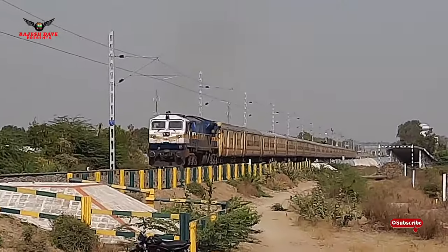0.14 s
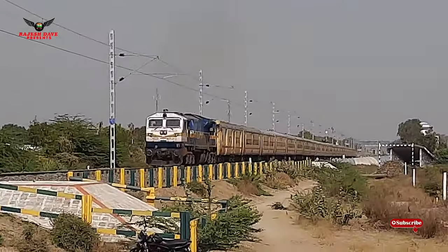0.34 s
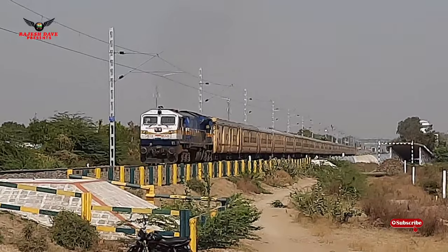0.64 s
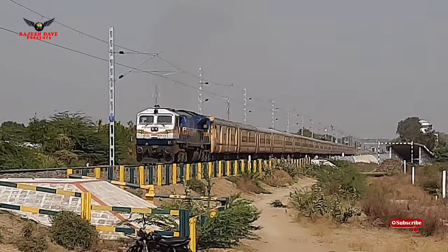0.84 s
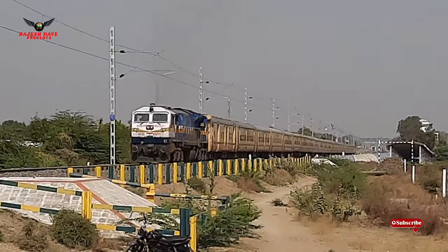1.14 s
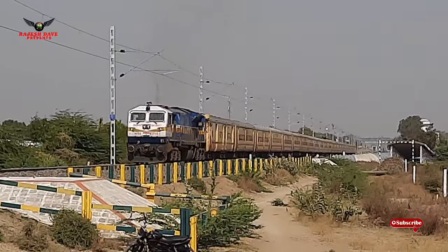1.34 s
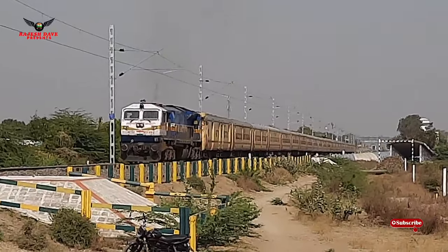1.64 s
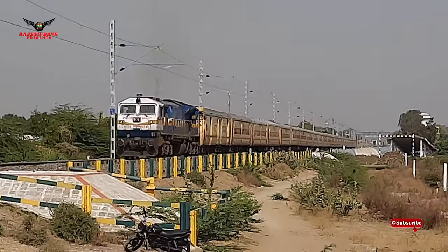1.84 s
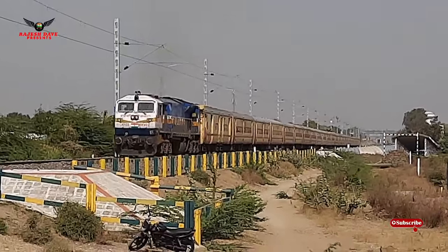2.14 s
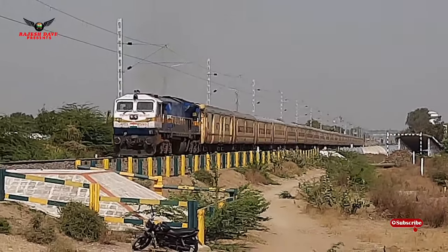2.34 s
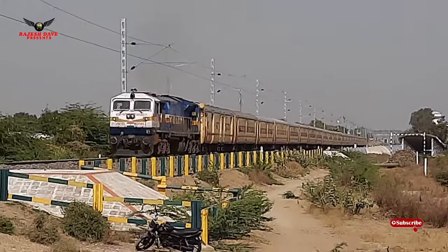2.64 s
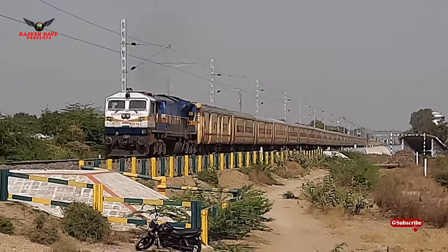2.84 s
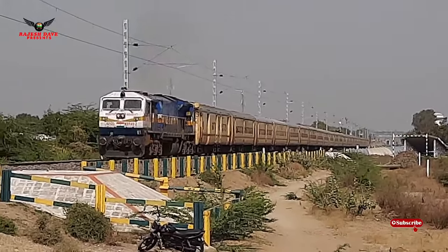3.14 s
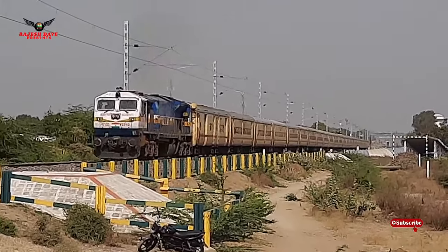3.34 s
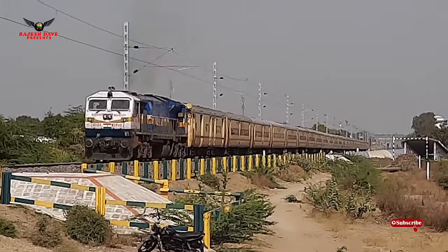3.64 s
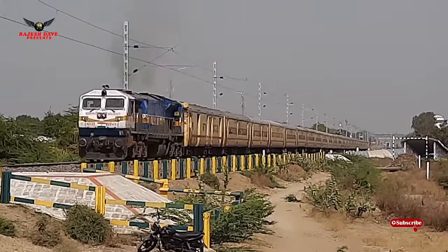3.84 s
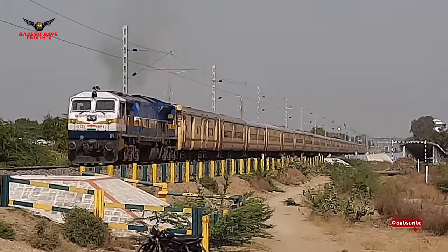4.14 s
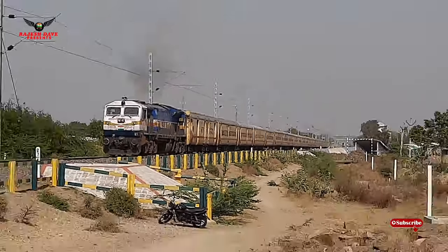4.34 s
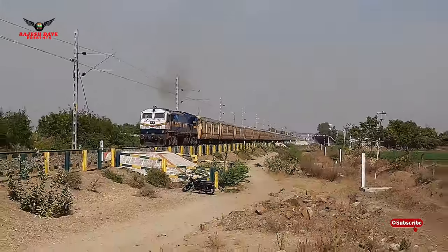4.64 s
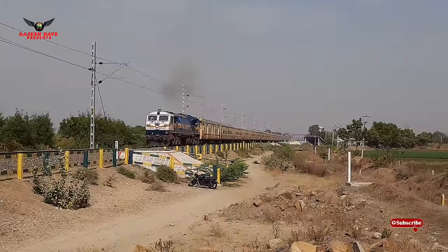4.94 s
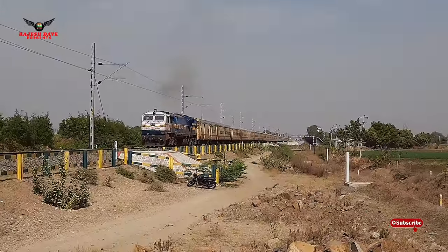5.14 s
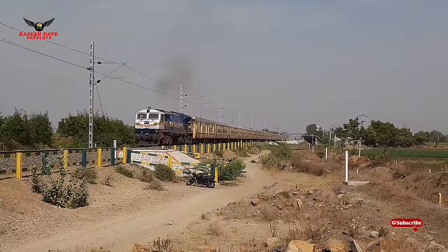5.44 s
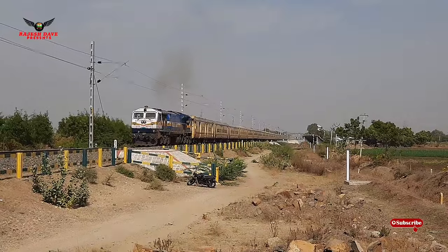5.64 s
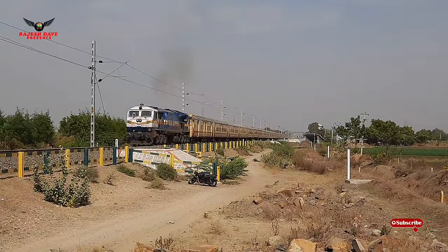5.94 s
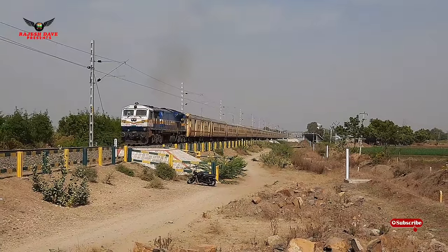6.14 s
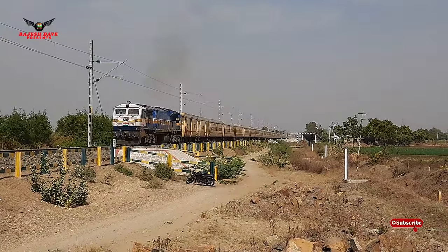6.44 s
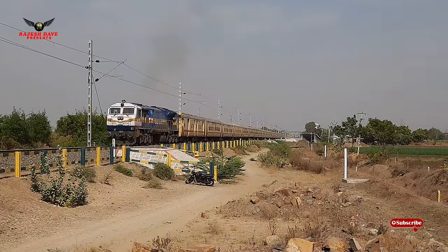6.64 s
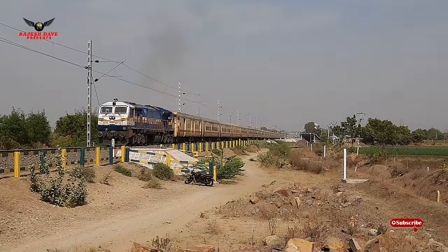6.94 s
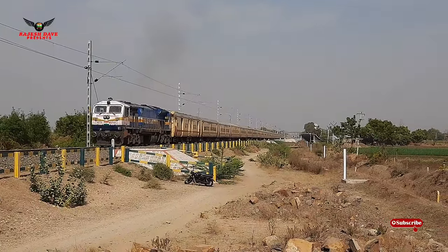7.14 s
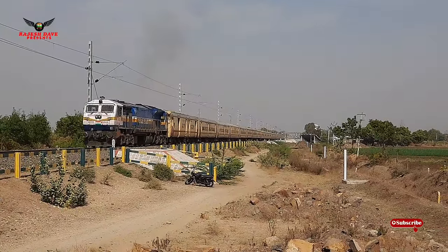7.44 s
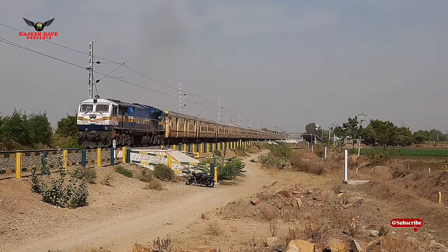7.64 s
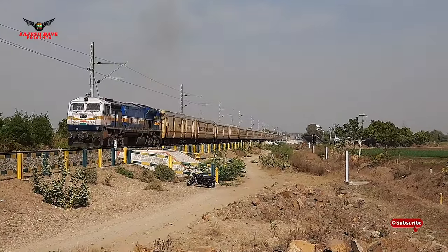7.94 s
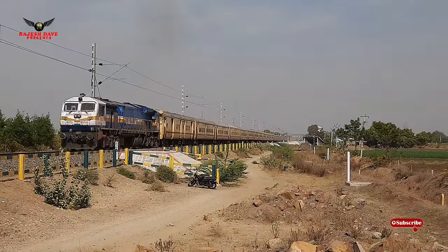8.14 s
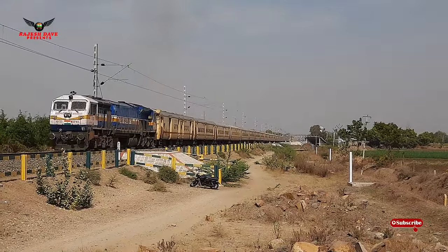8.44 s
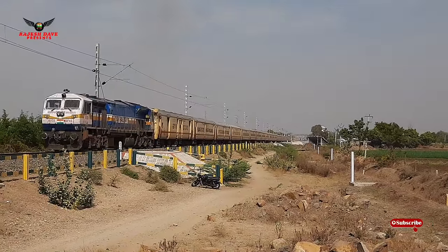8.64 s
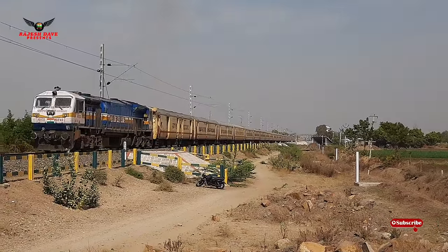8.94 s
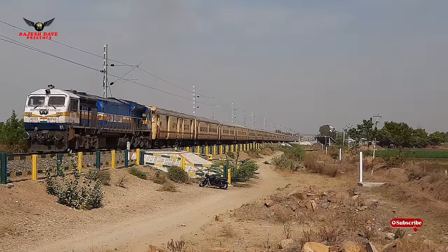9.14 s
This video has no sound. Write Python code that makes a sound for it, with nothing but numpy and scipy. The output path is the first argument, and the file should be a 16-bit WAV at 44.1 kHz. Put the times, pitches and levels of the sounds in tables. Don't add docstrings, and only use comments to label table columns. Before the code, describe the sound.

In open country, a distant diesel locomotive drones low and steady beneath lumpy wind buffeting and popping on a hand-held stereo microphone. Faint insects rasp. Around four seconds the engine revs up by about a tone; the wind eases later, and wheel roar, fan hum, gear whine and airy hiss swell strongly as the train closes in.

```python
import sys
import numpy as np
from scipy import signal
from scipy.io import wavfile
from scipy.ndimage import uniform_filter1d, map_coordinates

SR = 44100
rng = np.random.default_rng(int(sys.argv[2]) if len(sys.argv) > 2 else 0)


def unload_audio(sound):
    columns = np.transpose(np.atleast_2d(sound))
    steps = np.round(np.clip(columns, -1, 1) * 32767)
    wavfile.write(sys.argv[1], SR, steps.astype(np.int16))


def volts(x):
    e = np.asarray(x, float) / 20
    return 10 ** e


N = 409248
T = np.arange(N) / SR


def unit(x):
    return x / np.sqrt(np.mean(x ** 2) + 1e-20)


def along(points, hz):
    f, v = np.transpose(points)
    return np.interp(np.log(hz + 1), np.log(f + 1), v)


def curves(rows, t=T):
    s, *cols = np.transpose(rows)
    return [np.interp(t, s, c) for c in cols]


def wobble(rate):
    return map_coordinates(rng.standard_normal(int(N * rate / SR) + 4), [T * rate])


def held(rows):
    gain = 0
    for start, end, db, edge in rows:
        outside = np.maximum(np.maximum(start - T, T - end), 0)
        gain = gain + volts(db - edge * outside)
    return gain


# (time [s], share of near [0-1])
VIEW = [(0, 0), (4.8, 0), (5.4, 1), (9.28, 1)]


def side_on(t=T):
    return np.clip(curves(VIEW, t)[0], 0, 1)


def blend(pair, hz, t):
    near = side_on(t)
    return (1 - near) * along(pair[0], hz) + near * along(pair[1], hz)


# (time [s], closeness [0-1])
CLOSENESS = [(0, 0.04), (1, 0.01), (5.4, 0.23), (7.1, 0.38), (8.3, 0.82), (9.28, 1)]


def closeness(t=T):
    return curves(CLOSENESS, t)[0]


# (pitch [Hz], half width [Hz], level [dB])
TREBLE_GAPS = [
    (5250, 220, -9),
    (10300, 750, -8),
]
# (pitch [Hz], lead of the left [rad])
PORT_LEAD = [
    [(100, 0), (900, 0), (1900, .7), (2400, -.2), (3100, -1.4), (3600, -.5), (4100, -1.4), (4650, -3.3), (6200, -3.8), (6700, -7.2), (8100, -6), (9400, -6.3), (10400, -5.3), (14000, -6)],
    [(100, .1), (900, .1), (1900, 1), (2600, .8), (3300, -.4), (4300, .6), (5300, -1.9), (5700, -4.6), (7050, -5.8), (8100, -3.3), (9100, -2), (11000, -3), (12200, .1), (13400, 3.1)],
]
# (pitch [Hz], correlation [-1 to 1])
PORT_LIKENESS = [(200, .93), (900, .945), (2000, .93), (3600, .9), (4900, .7), (6700, .78), (9500, .7),
                 (11000, .55), (12500, .82)]
# (pitch [Hz], left over right [dB])
PORT_LEAN = [(200, 0.5), (670, 3), (1230, 0), (2250, 5), (4100, -1.5), (6500, 4.5), (8600, -5), (12300, 5)]


def rush(colour_db, patchy_db, alike=PORT_LIKENESS):
    frame = 1024
    hz, t, (a, b) = signal.stft(rng.standard_normal((2, N)), SR, nperseg=frame)
    hz = hz[:, None]
    close = np.clip(closeness(t), 0, 1) ** 3
    notch_db = sum(db * np.exp(-((hz - centre) / w) ** 4) for centre, w, db in TREBLE_GAPS)
    gain = volts(colour_db(hz, t) + close * notch_db)
    gain = gain / np.sqrt(np.mean(gain ** 2, axis=0))
    field = uniform_filter1d(rng.standard_normal(a.shape), 10, 0)
    field = uniform_filter1d(field, 7, 1)
    turn = np.arccos(np.clip(along(alike, hz), -1, 1)) / 2
    mid, side = np.cos(turn) * a, np.sin(turn) * b
    port = np.exp(.5j * blend(PORT_LEAD, hz, t)) * volts(along(PORT_LEAN, hz) / 2)
    pair = np.array([(mid + side) * port, (mid - side) / port])
    pair = pair * gain * volts(patchy_db * unit(field))
    return unit(signal.istft(pair, SR, nperseg=frame)[1][:, :N])


# (time [s], half width [s], level [dB], pitch [Hz])
AIR_SWELLS = [(.65, 0.098, 2.5, 7000), (1.15, 0.36, 6.5, 3500), (1.4, 0.18, 3, 5000),
              (2.02, 0.23, 6.5, 8500), (2.32, 0.33, -2, 3500), (2.79, 0.25, 3, 3500),
              (3.7, 0.27, 3.5, 7000), (4.19, 0.25, 7, 5200), (4.55, 0.46, 3.5, 1500),
              (5.15, 0.67, -5.5, 2330), (6.1, 0.14, 4, 2800), (6.42, 0.2, 7, 5200), (6.8, 0.15, 6, 7350),
              (7.45, 0.12, 4, 11000), (7.92, 0.049, 1, 13000), (8.06, .07, -0.5, 13000),
              (8.35, 0.18, 4.5, 10300), (8.57, 0.043, 0.5, 13100), (8.9, 0.057, 0, 13100)]


def carry(hz):
    reach = 1.5
    return sum(db * np.exp(-((T - s) / w) ** 2 - (np.log2(hz / centre) / reach) ** 2)
               for s, w, db, centre in AIR_SWELLS)


# (time [s], shaft speed [turns/s])
SHAFT_SPEED = [(0, 12.891), (.8, 12.87), (2.4, 12.865), (3.5, 12.895), (4.3, 13.428), (4.7, 13.786),
               (5.1, 13.997), (5.5, 14.098), (5.9, 14.121), (7.1, 14.413), (7.5, 14.481), (8.6, 14.502),
               (9.28, 14.545)]


def shaft():
    return .018 + np.cumsum(curves(SHAFT_SPEED)[0]) / SR


# (time [s], shaft angle [turns])
WEAK_FIRING = [(0, .17), (3.2, .17), (3.9, .1), (4.6, .24), (5.7, .67), (8.4, .68), (9.28, .62)]
# (time [s], firing order [dB], uneven running [dB], left over right [dB])
EXHAUST_STACK = [(0, -20, -34, 3.5), (.45, -21.5, -38, -6), (1, -17, -34.5, 2), (1.42, -23.5, -36.5, -12.5),
                 (1.8, -19, -30.5, 2), (2.2, -22, -25, -6.5), (2.72, -13.5, -27.5, 2.5),
                 (3.28, -17, -30, 0), (3.55, -17, -28, -1.5), (4.26, -13.5, -30.5, 0),
                 (4.55, -20.5, -28.5, 0.5), (5.05, -30.5, -32, -13), (5.5, -30, -35.5, -10),
                 (5.78, -18, -29, 2), (6.03, -18.5, -46, -4), (6.3, -14.5, -27, 1.5), (8.3, -14, -27, 2.5),
                 (9.28, -17.5, -24.5, 2.5)]
# (shaft order [multiple], level [dB])
UNEVEN_ORDERS = [(5, -7), (6, -6), (7, -8.5), (9, 1.5), (10, -1), (11, -17), (12, -26), (13, -11.5),
                 (14, -13.5), (16, -25), (20, -18.5), (23, -20), (24, -27), (25, -21.5)]


def exhaust(turns):
    firing_db, uneven_db, pan_db = curves(EXHAUST_STACK)
    bank_db = uneven_db - 9 + 7.5 * closeness()
    bank_db = bank_db + 1.2 * (1 - curves(VIEW)[0]) * wobble(2.8)
    weak = curves(WEAK_FIRING)[0]
    drone = volts(firing_db + .8 * wobble(9)) * np.cos(2 * np.pi * 8 * turns)
    drone += volts(bank_db) * np.cos(2 * np.pi * (4 * turns + .42))
    for order, db in UNEVEN_ORDERS:
        k = round(order)
        level = volts(uneven_db + db + 1.8 * wobble(2.94))
        drone -= level * np.cos(2 * np.pi * (k * turns - (k - 8) * weak))
    return np.sqrt(2) * drone * volts(np.array([pan_db, -pan_db]) / 2)


# (pitch [Hz], density [dB per Hz])
WHEEL_COLOUR = [
    [(150, -15.5), (250, -3.5), (395, -5.5), (496, -13), (649, -4.5), (728, -7.5), (787, -0.5), (888, -11), (983, -7.5), (1050, -19.5), (1360, -42), (2310, -120)],
    [(94, -34), (160, 8.5), (173, -7.5), (211, -5.5), (237, -5), (346, -2.5), (482, -13), (542, -13.5), (615, -5.5), (660, -5), (714, -6.5), (800, -4), (1050, -15), (1360, -53), (2310, -120)],
]
# (pitch [Hz], density [dB per Hz])
FAN_COLOUR = [
    [(590, -18), (1000, -17), (1120, -6.5), (1260, -6), (1400, 2), (1520, -3.5), (1880, -5.5), (2030, -8), (2130, -12.5), (2350, -22.5), (3060, -49), (5170, -120)],
    [(590, -41), (1050, -21.5), (1150, -10.5), (1320, -6), (1490, -9), (1610, -6.5), (1750, -13.5), (1970, -8), (2350, -19), (3060, -43), (5170, -120)],
]
# (pitch [Hz], density [dB per Hz])
CLATTER_COLOUR = [
    [(1350, -32.5), (2300, -10), (2550, -5), (2980, -7), (3160, -11), (3330, -11.5), (3500, -5.5), (3660, -8), (3790, -12), (4040, -16.5), (4300, -10.5), (4480, -8.5), (4600, -17), (4760, -12), (5250, -15.5), (6820, -40), (11600, -120)],
    [(1350, -33.5), (2300, -4), (2600, 2), (3040, -7), (3390, 2.5), (3550, 5), (4050, -7), (4450, -5.5), (4900, -14.5), (5250, -18.5), (6820, -51), (11600, -120)],
]
# (pitch [Hz], density [dB per Hz])
HISS_COLOUR = [
    [(4600, -44), (5200, -1.5), (6100, -4), (6970, -4.5), (7650, -7), (8690, -7.5), (9100, -13.5), (9400, -27), (9900, -30), (10150, -17), (10500, -16), (11000, -120)],
    [(4600, -44), (5050, -16.5), (5300, -15), (5600, -17), (6840, -10), (7870, -14), (8940, -15.5), (9410, -24), (9650, -25.5), (10900, -25), (11200, -25.5), (11800, -120)],
]
# (pitch [Hz], far level [dB], side-on gain [dB], close gain [dB])
ROAR_LAYERS = [
    (600, -35, 1, 7),
    (1500, -39, 2.5, 8.5),
    (3500, -48.5, 0, 13),
    (7000, -58, 1, 16.5),
]


def roar(turns):
    flutter = np.cos(2 * np.pi * 8 * turns)
    colours = WHEEL_COLOUR, FAN_COLOUR, CLATTER_COLOUR, HISS_COLOUR
    patchy = 1.3, 0.71, 1.16, 1.66
    depths = 0.032, 0.04, .06, 0.063
    out = 0
    for (hz, far_db, side_db, close_db), pair, patchy_db, depth in zip(ROAR_LAYERS, colours, patchy, depths):
        level_db = far_db + side_db * side_on_raw() + close_db * closeness() + carry(hz)
        noise = rush(lambda f, t: blend(pair, f, t), patchy_db)
        out = out + volts(level_db) * (1 + depth * flutter) * noise
    return out


def side_on_raw():
    return curves(VIEW)[0]


# (time [s], upper edge of the hiss [Hz])
ROTOR_EDGE = [(0, 11550), (2.2, 11480), (3.3, 11600), (3.9, 12000), (4.3, 12450), (5, 12780), (6, 13000),
              (7, 13150), (9.28, 13200)]


def turbo():
    def colour_db(hz, t):
        below = curves(ROTOR_EDGE, t)[0] - hz
        return np.interp(below, [-250, -62.5, 152.5, 698.5, 1401.5, 1903.0, 3206.5, 3594.0],
                         [-120, -34.0, -0.5, 0.5, -6.0, -12.0, -22.5, -120])
    idle = 12.87
    level_db = -70.5 + 3 * (curves(SHAFT_SPEED)[0] - idle) + 23 * closeness() + carry(hz=12500)
    return volts(level_db + 0.88 * wobble(11.0)) * rush(colour_db, patchy_db=2.0)


WHIRR_ORDERS = [29, 30.4, 31, 33.42, 41, 42.54, 43, 44, 46, 48.62, 49, 50, 52, 54.71, 60, 60.79, 79]
WHIRR_FAR = [-52, -62, -53, -62, -62, -60, -62, -60, -54, -60, -62, -54, -50, -62, -47, -62, -62]
WHIRR_NEAR = [-54, -47, -55, -46, -48, -42, -47, -43, -58, -45, -52, -46, -50, -46, -58, -48, -53]
# (start [s], end [s], level [dB], edges [dB/s])
FAN_NOTES = [
    (7.65, 8.55, -35, 90),
    (8.6, 8.9, -41, 40),
]
# (start [s], end [s], level [dB], edges [dB/s])
THROB_NOTES = [
    (5.35, 6.05, -47, 40),
    (6.25, 7.05, -45.5, 40),
    (7.3, 8.5, -40.5, 40),
    (8.8, 9.3, -42, 30),
]


def hum(turns):
    near = side_on()
    orders_db = -2 + near * (-6 + 9 * np.sqrt(np.clip(closeness(), 0, 1)))
    tones = held(FAN_NOTES) * volts(1.2 * wobble(3)) * np.sin(2 * np.pi * 211.5 * T)
    for k, far_db, near_db in zip(WHIRR_ORDERS, WHIRR_FAR, WHIRR_NEAR):
        level = volts(orders_db + far_db + near * (near_db - far_db) + 2 * wobble(3))
        tones += level * np.sin(2 * np.pi * (k * turns + .06 * wobble(7) + rng.random()))
    since = turns - turns[round(7.77 * SR)]
    beat = np.sin(2 * np.pi * 48.62 * since) + .7 * np.sin(2 * np.pi * 49 * since)
    tones += held(THROB_NOTES) * beat
    return np.sqrt(2) * tones * volts([[.8], [-.8]])


# (time [s], level [dB])
BREEZE_LEVEL = [(0, -27), (.6, -23.5), (1.1, -25.5), (2, -22), (6.6, -23.5), (7.3, -28), (9.28, -24)]
# (time [s], level [dB], port [-1 right to 1 left])
GUST_EVENTS = [(.43, 1.5, -0.18), (1.2, 2.5, .7), (2.14, 2, 0.75), (2.57, 5, -0.37), (3.0, -1, 0.15),
               (3.43, 4.5, 0.1), (3.85, 4, 0.3), (4.28, 6.5, -0.38), (4.71, 0.5, 0.27), (4.82, -1, -0.24),
               (6, 3, 0.058), (6.42, 5.5, 1), (6.85, 0.5, -1.26), (7.75, 1.5, -1.1), (8.14, -25, 0.93),
               (8.57, -5, 0.94), (9.28, -2.5, -0.36)]


def breeze():
    half_width = 0.27
    level_db = curves(BREEZE_LEVEL)[0]
    for s, db, port in GUST_EVENTS:
        lean = np.clip(1 + port * np.array([[1], [-1]]), 0, 1)
        level_db = level_db + db * lean * np.exp(-((T - s) / half_width) ** 2)
    return level_db


# (pitch [Hz], density [dB per Hz])
BUFFET_COLOUR = [(20, -41), (35, -10), (55, -6.5), (90, 7), (140, 3), (200, -4), (300, -17), (450, -18),
                 (700, -49.5), (1500, -140)]
# (time [s], level [dB], left over right [dB])
WIND_POPS = [(0.22, -17, 21), (.483, -17, -7), (.899, -19, 19), (1.45, -10, 18), (1.689, -19, -2),
             (1.776, -1.5, 0), (1.859, 0.5, -13), (2.233, -11, -2), (2.399, -11, 20), (2.56, -6, 9),
             (2.684, -5, 11), (2.834, -9, 15), (3.425, 5, 7), (3.639, -2, 6), (4.015, -7, 8), (4.116, 0, 4),
             (4.466, -12, 11), (4.584, 0, 11), (4.967, -8.5, 4), (5.073, -4, -25), (5.713, -7, 8),
             (6.298, 2, 6), (6.705, -27, 2), (8.455, 1, -8), (9.227, -23, 5)]


def wind():
    port_lumps = [2.3 * np.tanh(wobble(13)) + 4 * np.tanh(wobble(40)) for port in range(2)]
    lumps = volts(np.array(port_lumps) + 0.55 * np.tanh(wobble(9)))
    noise = rush(lambda hz, t: along(BUFFET_COLOUR, hz), 0.19, alike=[(50, 0.41), (130, 0.47), (300, -0.36)])
    buffeting = volts(breeze() + 3.0) * unit(lumps * noise)
    pops = np.zeros((2, N + SR))
    pitches = 242 * (1 + 0.29 * rng.uniform(-0.88, 1, (len(WIND_POPS), 1)))
    for (s, db, pan_db), hz in zip(WIND_POPS, pitches):
        u = (T[:SR // 20] - .025) * hz
        level = volts(db - 11.0 + np.array([[pan_db], [-pan_db]]) / 2)
        pops[:, round(s * SR):][:, :len(u)] += level * np.sin(5.54 * u) * np.exp(-1.6 * u * u)
    return buffeting + pops[:, SR // 40:][:, :N]


# (time [s], level [dB])
LOW_SURGES = [(0.07, 1), (0.16, 5), (0.195, -1), (0.349, 8), (0.444, 6), (0.549, 7), (0.654, 2),
              (0.698, 1), (0.873, 4.5), (0.968, 2), (1.122, 4.5), (1.277, 3), (1.417, 5.5), (1.492, 5),
              (1.581, 2.5), (1.676, -2), (1.721, 5), (1.791, 1), (1.881, 6.5), (1.961, 2), (2.03, 6),
              (2.26, 4.5), (2.33, 3), (2.405, 0), (2.559, 1), (2.784, 1), (2.973, 1.5), (3.078, 2),
              (3.278, 7.5), (3.362, 7), (3.407, 4.5), (3.602, 3), (3.836, 1.5), (4.006, 2.5), (4.111, 2),
              (4.156, 0.5), (4.215, 1), (4.265, 1), (4.42, -1), (4.49, 6), (4.654, 7), (4.809, 5.5),
              (4.939, 5.5), (5.044, 0), (5.343, 4), (5.453, -3), (5.662, 3), (5.827, -2), (5.867, 2.5),
              (5.932, -1.5), (6.111, 1.5), (6.221, 0.5), (6.47, -1)]
# (time [s], loss [dB])
LOW_SINKINGS = [(0.229, 1), (0.284, -1), (0.409, 1.5), (0.584, 4.5), (0.803, 3), (0.933, 2), (1.008, 0),
                (1.222, 6), (1.372, 2.5), (1.452, 1), (1.546, 6), (1.756, 2.5), (1.836, 1.5), (1.926, 2.5),
                (2.11, -1.5), (2.29, 2.5), (2.37, 3.5), (2.444, 2), (2.519, 4), (2.619, 3.5), (2.659, 5),
                (2.749, 2), (2.863, 3.5), (2.903, 8.0), (3.023, 5), (3.148, 5), (3.198, 3), (3.317, 3.5),
                (3.462, 1.5), (3.567, 5), (3.702, 0.5), (3.871, 0), (3.971, 7), (4.046, 5), (4.31, 3.5),
                (4.545, 2.5), (4.59, -0.5), (4.779, 2), (4.889, 1), (5.068, 3.5), (5.108, 3), (5.188, 2),
                (5.283, 5), (5.532, 1), (5.627, 2), (5.692, 1), (5.752, -1), (5.956, 4), (6.021, 5.5),
                (6.076, 2), (6.146, 3), (6.331, 1), (6.425, 5.5), (6.605, 0.5), (6.685, -0.5)]


def low_flicker():
    half_width = .022
    bump = lambda rows: sum(db * np.exp(-((T - s) / half_width) ** 2) for s, db in rows)
    return bump(LOW_SURGES) - bump(LOW_SINKINGS)


# (time [s], loss [dB], half width [s])
LOW_DIPS = [(.25, 12, 0.012), (.36, 19, 0.02), (.63, 3, 0.048), (1.52, 9.5, 0.018), (2.17, 9, 0.02),
            (2.5, 2, 0.038), (3.132, 5, 0.014), (3.8, 14, 0.0053), (4.042, 4, 0.0092), (4.43, 11, 0.01),
            (5.12, 2, 0.011)]


def gusts(turns):
    windy = np.clip((np.max(breeze(), axis=0) + 30) / 6, 0, 1)
    sag = np.cos(np.pi * (turns - curves(WEAK_FIRING)[0] + .02 * wobble(8))) ** 4
    sag = sag * (1 + .15 * np.tanh(wobble(10)))
    lulls_db = sum(db * np.exp(-((T - s) / w) ** 2) for s, db, w in LOW_DIPS)
    chug_db = windy * (0.37 * np.tanh(wobble(16)) - 5 * sag)
    return volts(chug_db + low_flicker() - lulls_db), volts(-7 * sag), volts(-.2 * lulls_db)


# (start [s], end [s], level [dB], edges [dB/s])
FAR_INSECTS = [(0, .95, -88, 30), (1.15, 1.3, -90, 90), (1.62, 1.8, -89, 90), (2.15, 2.6, -88, 70),
               (3.1, 3.3, -89, 60), (3.55, 3.65, -91, 80)]
# (start [s], end [s], level [dB], edges [dB/s])
NEAR_INSECT = [
    (.355, .45, -63, 1200),
    (.42, .62, -64, 220),
]
# (time [s], level [dB], decay by 60 dB [s])
GRASS_TICKS = [
    (7.955, -49, 0.031),
    (8.2, -59, 0.0061),
    (8.655, -54, 0.005),
]


def grass():
    near_colour = [(10500, -120), (11000, -24), (12000, -12.0), (12500, -8), (13200, 4.5), (14500, -14.0),
                   (15300, -26.5), (15800, -120)]
    far_colour = [(12000, -120), (12500, -22), (13500, -7), (14400, 0), (15100, -4.0), (15600, -120)]
    level = held(NEAR_INSECT)
    for s, db, t60 in GRASS_TICKS:
        level = level + volts(db - 60 * np.abs(T - s) / t60)
    near = rush(lambda hz, t: along(near_colour, hz), 2, alike=[(12000, .3)])
    far = rush(lambda hz, t: along(far_colour, hz), 5, alike=[(12000, .3)])
    return level * volts([[4], [-6]]) * near + held(FAR_INSECTS) * far


# (time [s], level [dB], pitch [Hz])
SHARP_EDDIES = [(1.858, -16.5, 580), (4.9, -33, 480), (1.6, -28, 920), (0.72, -33, 520), (5.046, -13.5, 74),
                (11, -19, 140), (2.7, -19, 260), (3.42, -14, 340), (2.5, -21, 240)]


def snaps():
    return sum(volts(db) * np.sin(2 * np.pi * hz * (T - s)) * np.exp(-2 * (hz * (T - s)) ** 2)
               for s, db, hz in SHARP_EDDIES)


# (start [s], end [s], level [dB], edges [dB/s])
LOWER_MESH = [(3.93, 4, -41, 200), (4.13, 4.35, -41.5, 200), (4.375, 4.435, -33, 700),
              (4.47, 4.56, -38, 500), (4.62, 4.82, -45, 150), (6.27, 6.54, -39.5, 300),
              (6.33, 6.54, -42, 500), (6.7, 6.95, -46, 100), (6.98, 7.07, -43, 150), (7.3, 8, -46, 20),
              (8.3, 9.3, -39, 20)]
# (start [s], end [s], level [dB], edges [dB/s])
UPPER_MESH = [
    (6.9, 7.5, -50, 20),
    (7.72, 8.45, -40, 50),
    (8.6, 9.3, -47, 20),
]


def gears(turns):
    whine = 0
    for teeth, notes in ((110.15, LOWER_MESH), (113, UPPER_MESH)):
        flutter = volts(.6 * wobble(7)) * np.exp(.55j * wobble(16))
        phase = 2j * np.pi * teeth * turns + [[.35j], [-.35j]]
        whine = whine + (held(notes) + volts(-68.5)) * np.imag(flutter * np.exp(phase))
    return np.sqrt(2) * whine * volts([[1], [-1]])


def scene():
    turns = shaft()
    low, gate, high = gusts(turns)
    rumble = low * (exhaust(turns) + gate * wind())
    train = high * (gears(turns) + hum(turns) + roar(turns) + turbo())
    return rumble + train + snaps() + grass()


def band_limit(x):
    return signal.sosfilt(signal.butter(12, 15100, fs=SR, output="sos"), x)


def record(dry):
    limited = dry / (1 + np.abs(dry / .95) ** 6) ** (1 / 6)
    return band_limit(limited)


dry = scene()
out = record(dry)
unload_audio(out)
```